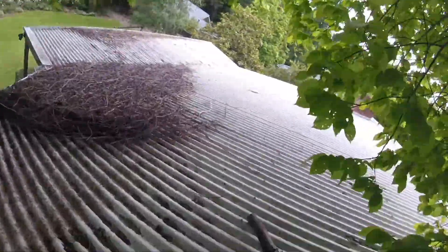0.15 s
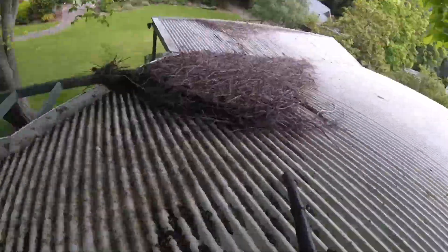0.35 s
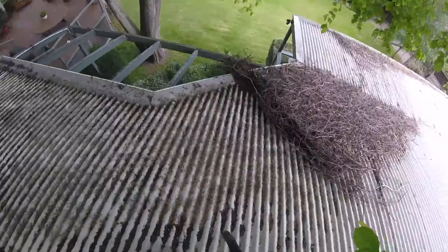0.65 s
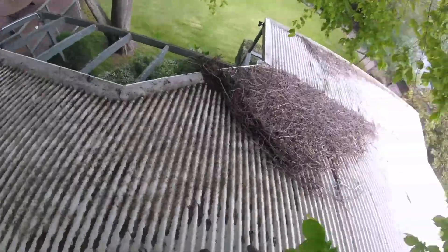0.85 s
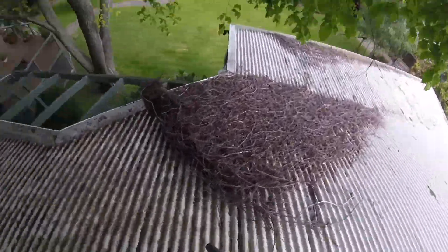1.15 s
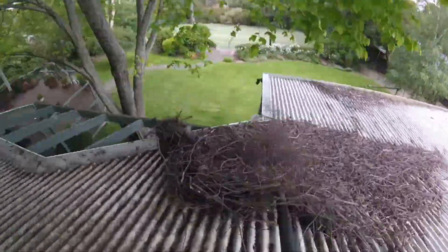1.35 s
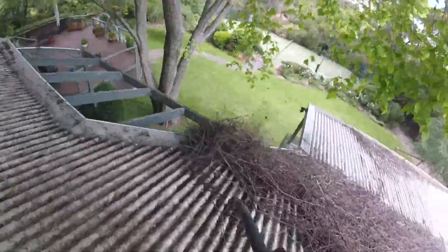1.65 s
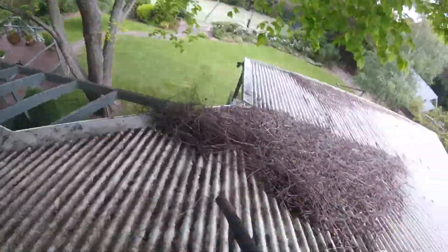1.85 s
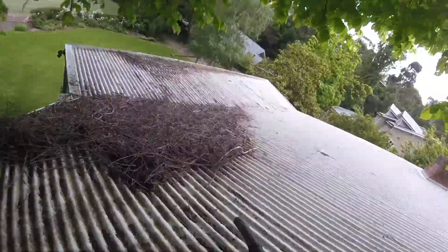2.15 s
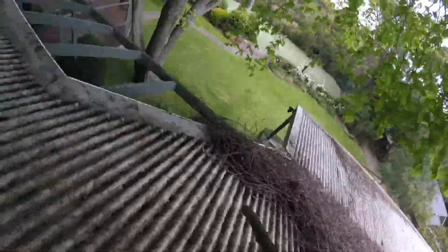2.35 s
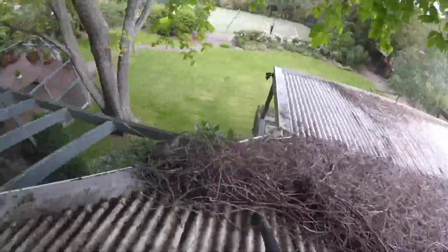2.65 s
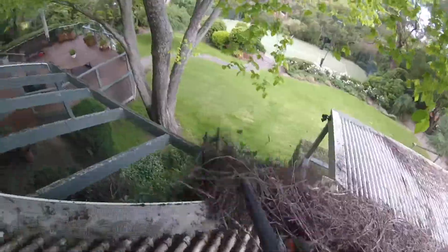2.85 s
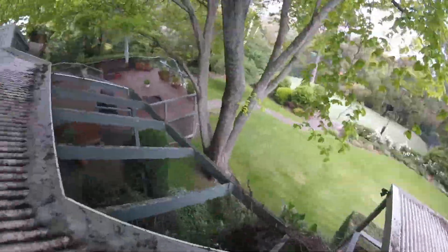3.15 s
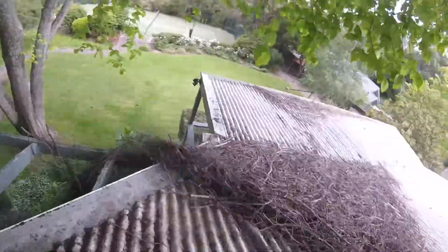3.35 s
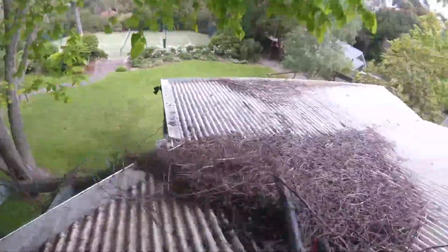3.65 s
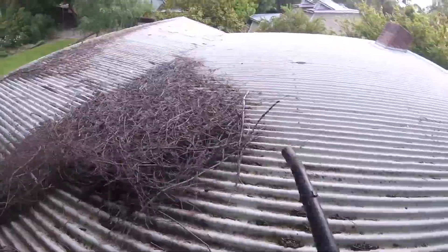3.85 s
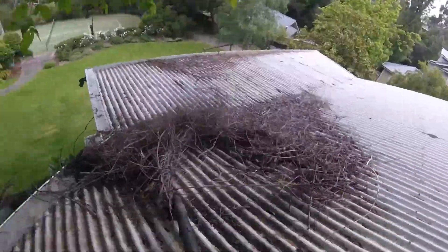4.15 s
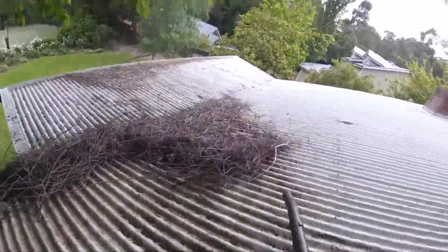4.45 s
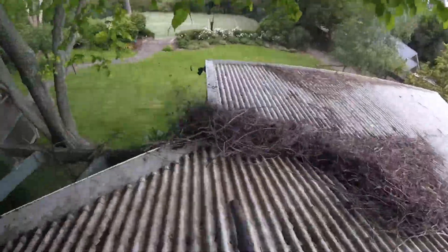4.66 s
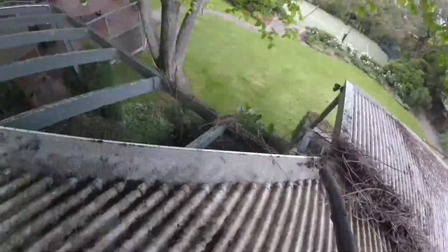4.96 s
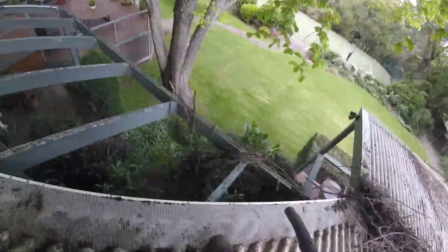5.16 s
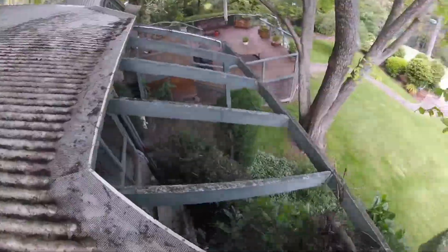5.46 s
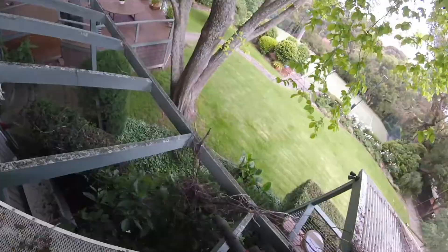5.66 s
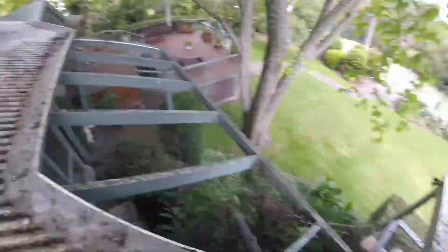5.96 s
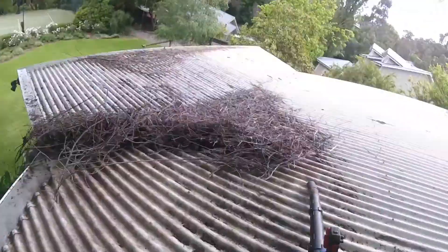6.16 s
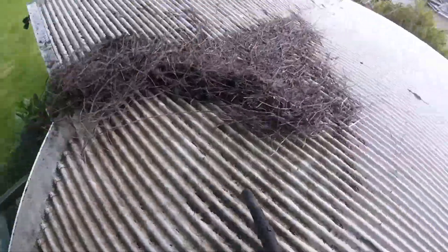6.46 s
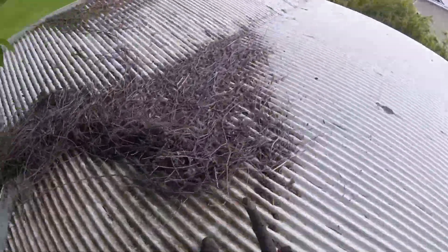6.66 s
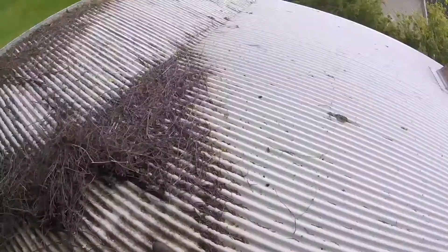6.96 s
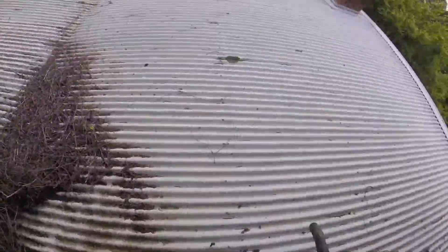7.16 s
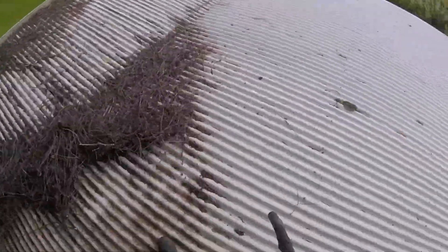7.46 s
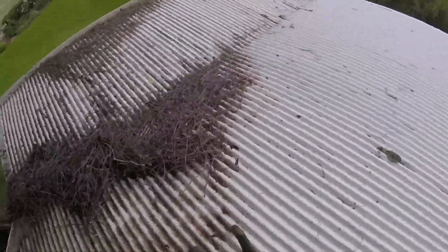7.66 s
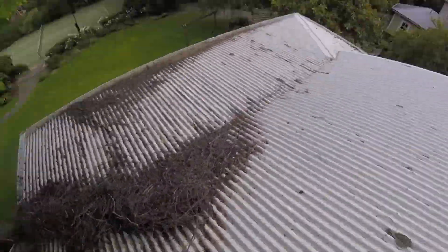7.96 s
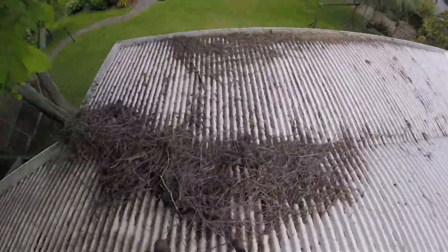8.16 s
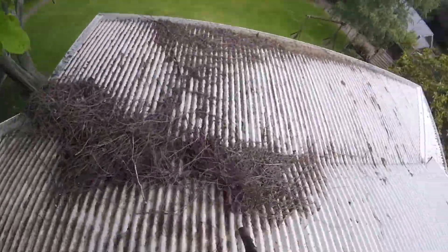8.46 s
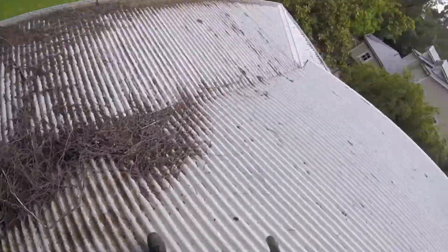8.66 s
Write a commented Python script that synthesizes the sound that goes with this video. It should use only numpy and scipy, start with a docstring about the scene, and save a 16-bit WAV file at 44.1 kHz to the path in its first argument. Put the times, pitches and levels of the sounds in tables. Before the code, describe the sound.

Constant piercing high-speed blower whine and dense airy roar, wavering and briefly revving, while footsteps and bumps knock on corrugated metal.

```python
"""A small two-stroke leaf blower at full throttle, close to one worn microphone over a sheet roof, its pitch as if
played fast. From the start its orders scream over fan roar, drone, rumble and the jet's hiss on twigs; from 0.4 s
steps and bumps thud through the sheet. The firing tone is nearly lost from 0.66 to 1.3 s; six brief level dips
fall between 1.3 and 6.8 s. After 6.5 s the tone is mostly faint, with bursts near 7.4 s; two twigs tick near 8.6 s.
Engine: sines on one crank angle. Air: coloured noise. Thuds: decaying sheet modes with noise rattle."""
import sys
import numpy as np
from scipy import signal
from scipy.fft import rfft, irfft, next_fast_len
from scipy.io import wavfile
from scipy.ndimage import uniform_filter1d, map_coordinates

SR = 44100
rng = np.random.default_rng(int(sys.argv[2]) if len(sys.argv) > 2 else 0)


def store_wav(level_fs):
    """Save 16-bit WAV to argv[1]."""
    pcm = np.round(np.clip(np.atleast_2d(level_fs), -1, 1) * 32767)
    wavfile.write(sys.argv[1], SR, pcm.T.astype(np.int16))


def linear_from_db(decibels):
    """Turn decibels (scalar or array-like) into linear amplitude factors; 0 gives 1."""
    return 10 ** (np.asarray(decibels, float) / 20)


N = 388521  # samples

# firing tone, coming and going as the blower turns, before flutter: t/s, level/dB (rms)
FIRING_TONE = [(0, -32.5), (0.52, -33), (0.66, -52.5), (1.29, -54.5), (1.39, -31.5), (2.8, -32.5),
               (2.89, -36), (3.0, -34), (5.0, -32), (5.78, -34), (5.88, -36.5), (6.13, -32.5), (6.43, -37),
               (6.52, -52), (6.8, -43.5), (7.25, -43), (7.32, -49), (7.36, -31.5), (7.4, -50), (7.445, -36),
               (7.5, -49), (7.9, -46), (8.1, -53), (8.25, -46), (8.8, -47)]
FIRING_MEAN_DB = -38  # reference for what follows the firing tone


def unit(x):
    """Scale to rms 1."""
    return x / np.sqrt(np.mean(x ** 2) + 1e-20)


def curves(rows):
    """Straight lines between the rows: one value per sample for each column after the time."""
    s, *cols = np.transpose(rows)
    return [np.interp(np.arange(N) / SR, s, c) for c in cols]


def wobble(rate):
    """A smooth random curve, rate knots a second."""
    knots = rng.standard_normal(int(N * rate / SR) + 4)
    return map_coordinates(knots, [np.arange(N) * rate / SR])


def rush(spectrum, patchy_db, gate=1):
    """Turbulence: noise of rms 1 with patches of random gain, pulsed by gate before its colour."""
    noise = rng.standard_normal(N + 512) * np.pad(gate * np.ones(N), (0, 512))
    cells = signal.stft(noise, nperseg=512)[2]
    patches = uniform_filter1d(rng.standard_normal(cells.shape), 6, 0)
    patches = unit(uniform_filter1d(patches, 10, 1))
    patchy = signal.istft(cells * linear_from_db(patchy_db * patches), nperseg=512)[1][:N]
    size = next_fast_len(N + 8192)
    hz, db = np.transpose(spectrum)
    log_hz = np.log(np.fft.rfftfreq(size, 1 / SR) + 1)
    gain = linear_from_db(np.interp(log_hz, np.log(hz + 1), db, -120, -120))
    return unit(irfft(rfft(patchy, size) * gain, size)[:N])


def casing_rush():
    """Steady low rush from the casing: coloured noise at a fixed level."""
    # colour before scaling: f/Hz, level/dB
    casing_colour = [(20, -31), (60, -26), (150, -30), (480, -25), (700, -6.5), (850, -6.5), (1100, -13.5),
                     (1400, -44)]
    return linear_from_db(-45) * rush(casing_colour, patchy_db=1.2)


def wind_rumble():
    """Wind rumble: low noise made lumpy by two random gain curves, rms 1."""
    # colour before scaling: f/Hz, level/dB
    rumble_colour = [(110, -11), (190, -3.5), (300, -2.5), (450, -0.5), (650, 1.5), (900, -9)]
    lumps = linear_from_db(0.74 * wobble(15) + 1.4 * wobble(40))
    return unit(lumps * rush(rumble_colour, patchy_db=3.5))


def inlet_drone():
    """Inlet drone: a noise band that gains 0.21 dB for each dB the firing tone fades."""
    # colour before scaling: f/Hz, level/dB
    drone_colour = [(800, -20), (1050, -9.5), (1450, -1.5), (1900, -2.5), (2500, -17)]
    drone_db = -42 - 0.21 * (curves(FIRING_TONE)[0] - FIRING_MEAN_DB)
    return linear_from_db(drone_db + 1.07 * wobble(7.7)) * rush(drone_colour, patchy_db=1.5)


def jet_hiss(firing, sweep):
    """Jet on the twigs: treble noise pulsed by the firing, with slow and quick swells."""
    # colour before scaling: f/Hz, level/dB
    hiss_colour = [(5000, -26), (7000, -2), (9000, -5), (11000, -5), (13000, -11), (14800, -15.5),
                   (15300, -45), (16000, -40)]
    swell_db = 0.2 * sweep + 0.96 * wobble(16) + 0.5 * wobble(30)
    return linear_from_db(swell_db) * rush(hiss_colour, patchy_db=1.76, gate=firing)


def fan_roar(firing, sweep):
    """Fan: broad noise pulsed by the firing, swelling slowly."""
    # colour before scaling: f/Hz, level/dB
    roar_colour = [(1300, -54), (1900, -3.5), (2400, 2), (3000, 2.5), (4200, 1), (5500, -1.5),
                   (7000, -11.5), (9000, -23)]
    return linear_from_db(0.39 * sweep) * rush(roar_colour, patchy_db=1.07, gate=firing)


def air(angle):
    """All moving air: roar and hiss share the firing pulses and one slow swell."""
    # air levels before the random swells: t/s, rumble level/dB, fan roar level/dB, jet hiss level/dB
    air_levels = [(0, -55, -27.5, -34.5), (0.45, -45.5, -28, -35), (0.6, -55.5, -27.5, -35),
                  (1.24, -50.5, -27, -33.5), (2.03, -53.5, -27.5, -36.5), (2.71, -51.5, -28.5, -33),
                  (2.95, -57.5, -28.5, -35.5), (3.84, -53, -28, -34.5), (4.42, -49, -27, -33),
                  (4.66, -54, -28, -34), (5.17, -51, -27, -32.5), (5.6, -59, -27, -35),
                  (5.93, -55, -25.5, -36), (6.27, -52.5, -28.5, -34), (6.7, -51.5, -26, -32.5),
                  (6.81, -54.5, -27.5, -34.5), (8.8, -55.5, -27.5, -35)]
    rumble_db, roar_db, hiss_db = curves(air_levels)
    firing = 1 + 0.21 * np.cos(angle)
    sweep = wobble(5.3)
    low = casing_rush() + linear_from_db(rumble_db) * wind_rumble() + inlet_drone()
    return low + linear_from_db(roar_db) * fan_roar(firing, sweep) + linear_from_db(hiss_db) * jet_hiss(firing, sweep)


def thuds():
    """Steps and bumps: decaying sheet modes, each at a new random strength, with a noise rattle."""
    # knocks on the roof: t/s, level/dB, rattle level against the knock/dB, brightness tilt/(dB per octave)
    roof_knocks = [(0.398, -27, -2, -2), (0.581, -34, 4, -2), (1.964, -30, -7, -1), (2.383, -18, -17, 3),
                   (2.649, -32, 0, -6), (3.455, -35, -5, -5), (3.582, -32, 4, -2), (3.925, -42, 15, 0),
                   (3.983, -34, -2, -6), (4.171, -33, -3, -1), (4.327, -30, -2, -4), (4.429, -27, 2, -5),
                   (4.59, -30, -3, -3), (4.8, -36, -3, -4), (4.964, -36, 8, -2), (5.073, -27, -2, -3),
                   (6.282, -33, 4, -1), (6.525, -29, -3, 3.5), (6.733, -25, -3, 0), (7.335, -36, 6, 2),
                   (7.424, -40, 9, 2), (8.47, -29, -3, 0), (8.557, -31, 4, 0)]
    # modes of the roof sheet, levels before tilt and chance: f/Hz, level/dB, time to fall 60 dB/s
    sheet_modes = [(111, -23, 0.083), (220, -9, 0.049), (385, -2, 0.029), (545, -7, 0.045)]
    out, t = np.zeros(N + SR), np.arange(SR // 10) / SR
    tinny = signal.butter(2, [450, 1900], "bandpass", fs=SR)
    onset = 1 - np.exp(-t / 0.0044)
    for s, db, rattle_db, tilt_db in roof_knocks:
        boom = np.zeros(len(t))
        for hz, mode_db, t60 in sheet_modes:
            # the tilt pivots on the third mode
            strength_db = mode_db + tilt_db * np.log2(hz / sheet_modes[2][0]) + rng.normal(0, 1.5)
            boom += linear_from_db(strength_db - 60 * t / t60) * np.sin(2 * np.pi * hz * t)
        noise = unit(signal.lfilter(*tinny, rng.standard_normal(len(t))))
        rattle = linear_from_db(rattle_db - 60 * t / 0.085) * noise
        out[round(s * SR):][:len(t)] += linear_from_db(db) * onset * (boom + rattle)
    return out[:N]


def twig_ticks():
    """Twigs ticking on the sheet: sparks of treble noise that fall 60 dB in 0.06 s."""
    # ticks: t/s, level/dB at the start
    tick_times = [(8.5642, -30), (8.6378, -34)]
    out, t = np.zeros(N + SR), np.arange(SR // 10) / SR
    sharp = signal.butter(2, [8500, 13500], "bandpass", fs=SR)
    for s, db in tick_times:
        spark = unit(signal.lfilter(*sharp, rng.standard_normal(len(t))))
        out[round(s * SR):][:len(t)] += linear_from_db(db - 60 * t / 0.06) * spark
    return out[:N]


def surges():
    """The engine races while the nozzle is choked: bell-shaped rises above running speed, Hz."""
    # chokes of the nozzle: t/s of the top, rise of the firing rate/Hz, spread of the rising side/s
    chokes = [(0.69, 30, .026), (1.375, 23, .032), (1.59, 8, .02), (2.695, 18, .035), (2.865, 14, .045),
              (6.6, 9, .025), (6.86, 48, .042), (7.365, 31, .02), (7.45, 41, .024), (7.665, 37, .033),
              (8.272, 33, .036), (8.595, 14, .018), (8.72, 7, .035)]
    fall_slower = 1.3  # falling side against rising side
    t = np.arange(N) / SR
    rise_hz = np.zeros(N)
    for s, hz, half in chokes:
        spread = half * np.where(t > s, fall_slower, 1)
        rise_hz += hz * np.exp(-.5 * ((t - s) / spread) ** 2)
    return rise_hz


def crank(surge_hz):
    """Firing phase in radians: running speed and surges, with a little random unevenness."""
    # running speed before surges and unevenness: t/s, firing rate f/Hz
    running_speed = [(0, 808), (0.95, 804), (1.7, 807.4), (2.45, 805.3), (3.9, 809), (4.58, 810),
                     (4.7, 804), (5.27, 799), (6.0, 804), (6.5, 804), (7.1, 809), (8.8, 807.4)]
    rate_hz = (curves(running_speed)[0] + surge_hz) * (1 + .0012 * wobble(60))
    return 2 * np.pi * np.cumsum(rate_hz) / SR


def engine(angle, surge_hz):
    """Exhaust orders as sines; the higher the order, the more its echo off the roof makes it flutter."""
    # third order, cancelled now and then by the roof echo, before flutter: t/s, level/dB (rms)
    third_order = [(0, -28.5), (0.5, -31.5), (0.62, -34), (0.78, -29), (1.2, -30.5), (1.33, -35),
                   (1.47, -29.5), (2.39, -31), (2.47, -48), (2.56, -31), (2.64, -46), (2.71, -30.5),
                   (3.76, -32.5), (3.92, -29.5), (4.06, -33), (4.48, -28.5), (4.54, -32), (5.0, -31),
                   (5.2, -38), (5.54, -32), (5.72, -34), (5.85, -27.5), (6.05, -30.5), (6.12, -39.5),
                   (6.45, -30), (6.51, -38), (6.6, -31.5), (6.87, -36), (7.0, -31), (7.95, -30.5),
                   (8.3, -33.5), (8.8, -28.5)]
    # upper whine: t/s, level about its mean/dB, seventh order level/dB (rms, before flutter)
    upper_whine = [(0, -2.5, -39), (0.42, -0.5, -46), (0.65, -3.5, -37), (1.0, 0, -41), (1.33, -4, -39.5),
                   (2.1, 1.5, -40), (2.4, -2, -37), (2.7, -2, -42), (3.2, -2, -42), (3.8, 4.5, -37),
                   (3.92, 1.5, -46), (4.05, 3, -38), (4.45, -2, -41), (4.56, 2, -36), (5.25, -4, -50),
                   (5.5, 3.5, -35), (5.9, -1.5, -40), (6.2, 3, -40), (6.75, -3, -42), (6.88, -3, -42),
                   (7.1, 2.5, -45), (7.4, -2, -46), (7.92, 0, -47), (8.05, 0, -39), (8.35, -1, -39),
                   (8.6, 0, -46), (8.8, 0, -47)]
    # other orders before drift and flutter: multiple of the firing rate, base level/dB (rms),
    # gain with firing tone/(dB per dB), third order/(dB per dB), upper whine/(dB per dB), surge/(dB per Hz)
    following_orders = [(2, -44, -.35, -.6, 0.0065, -.06), (4, -41, 0, 0, 0.48, 0.033),
                        (5, -35, 0, 0, 0.96, .03), (6, -36, 0.17, 0, 0.88, 0.028),
                        (8, -38, 0, .2, 0.29, -.15)]
    third_mean_db, drift_db = -32, 1.5
    firing, third = curves(FIRING_TONE)[0], curves(third_order)[0]
    upper, seventh = curves(upper_whine)
    orders = [(1, firing), (3, third), (7, seventh), (11, -52)]
    for k, db, by_firing, by_third, by_upper, by_surge in following_orders:
        order_db = db + by_firing * (firing - FIRING_MEAN_DB) + by_third * (third - third_mean_db)
        order_db = order_db + by_upper * upper + by_surge * surge_hz
        orders.append((round(k), order_db + drift_db * wobble(5)))
    tone = np.zeros(N)
    for k, db in orders:
        flutter_db = .5 * np.sqrt(k) * (1.18 * wobble(14) + 1.0 * wobble(70))
        sine = np.sin(k * angle + rng.uniform(0, 2 * np.pi))
        tone += np.sqrt(2) * linear_from_db(db + flutter_db) * sine  # root 2: peak of a sine from its rms
    return tone


def scene():
    """Everything reaches one microphone, laid alike on two channels."""
    surge_hz = surges()
    angle = crank(surge_hz)
    mono = air(angle) + thuds() + twig_ticks() + engine(angle, surge_hz)
    return np.tile(mono, (2, 1))


def level_dips():
    """Gain of the whole sound: it sinks at once and creeps back exponentially."""
    # dips: t/s, depth/dB, recovery time constant/s
    sinks = [(1.3, 2.5, 0.027), (2.85, 3, 0.14), (4.05, 2.5, 0.15), (5.099, 5.5, 0.12), (6.48, 1, 0.097),
             (6.78, 1.5, 0.2)]
    t = np.arange(N) / SR
    dip_db = sum(db * (t > s) * np.exp(-np.abs(t - s) / back) for s, db, back in sinks)
    return linear_from_db(-dip_db)


def top_cut(x):
    """Nothing passes above the cut-off."""
    return signal.sosfilt(signal.butter(12, 15770, fs=SR, output="sos"), x)


def record(dry):
    """The level of everything at the microphone dips briefly and recovers."""
    mix = dry * level_dips()
    return top_cut(mix)


dry = scene()
out = record(dry)
store_wav(out)
```